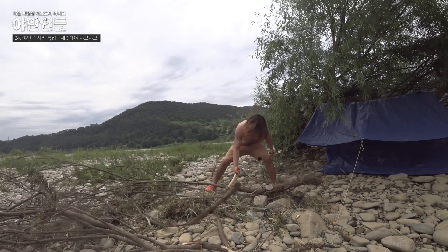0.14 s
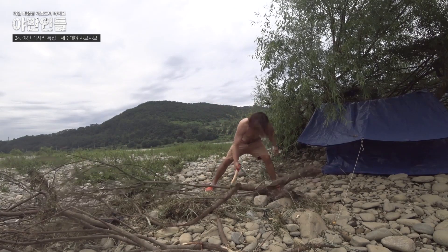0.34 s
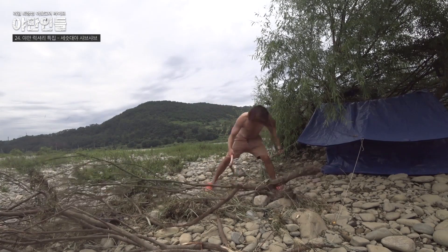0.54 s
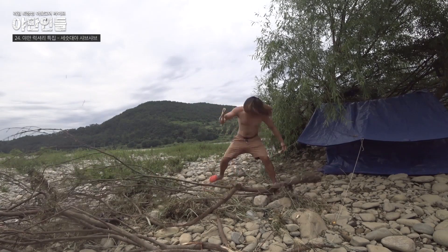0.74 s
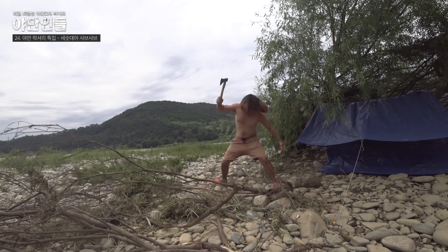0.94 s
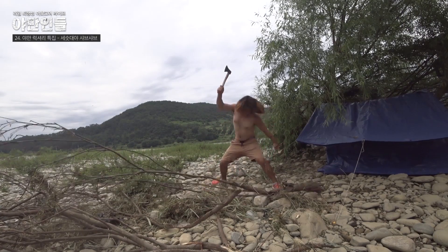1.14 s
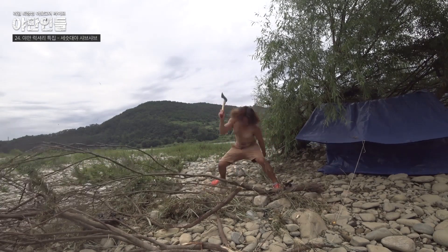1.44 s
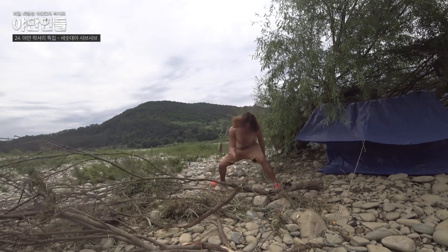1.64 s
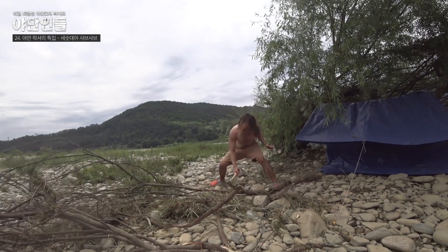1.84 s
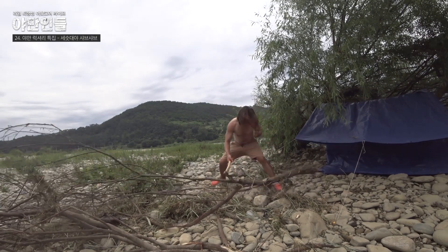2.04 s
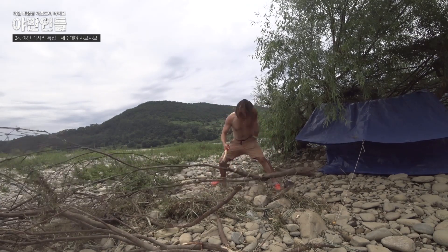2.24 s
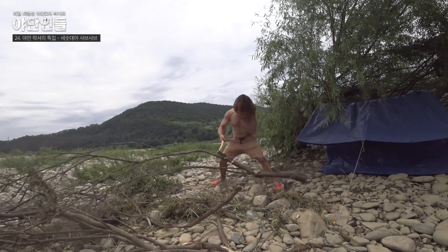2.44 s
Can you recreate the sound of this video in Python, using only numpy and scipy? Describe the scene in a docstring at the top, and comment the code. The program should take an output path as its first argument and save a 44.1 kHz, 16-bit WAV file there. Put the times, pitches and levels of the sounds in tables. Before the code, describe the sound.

A hatchet chops into a dead log at about 0.25 seconds, a sharp crack with a woody thud, and dry twigs rattle until 0.6. From 0.9 to 1.7, loose stones clack and grind softly underfoot and a twig snaps. A second chop lands at 1.8 with another rattle, followed by light stone scuffs until 2.5. Everything is a few metres away, over a faint, low outdoor rush.

```python
"""Two hatchet chops crack into a dead, branching log on a stony riverbank, a few metres away.
Each bite of the blade knocks the log against the cobbles: the trunk thuds and rings, and its dry
twigs rattle and settle. Between and after the blows, feet clack and grind on loose stones and the
odd twig snaps. A short scatter off the bank and a low outdoor rush sit behind it all."""
import sys
import numpy as np
from scipy import signal
from scipy.fft import rfft, irfft, next_fast_len
from scipy.io import wavfile

SR = 44100
rng = np.random.default_rng(int(sys.argv[2]) if len(sys.argv) > 2 else 0)


def master_out(mix):
    """Clip the mix to full scale and print it as 16-bit PCM to the path in sys.argv[1]."""
    frames = np.transpose(np.atleast_2d(mix))
    ceiling = np.clip(frames, -1, 1)
    pcm = np.round(ceiling * 32767).astype(np.int16)
    wavfile.write(sys.argv[1], SR, pcm)


N = 114660

# the blade biting and the wood splitting: start_s, level_db, decay_s, pitch_hz, width_ratio
BITES = [(.2474, -18, .0003, 3250, .12), (.2545, -21.5, .003, 3300, .17), (.2818, -23.5, .003, 2300, .35),
         (1.7870, -32, .004, 3100, .25), (1.7922, -18.5, .0018, 2500, .36), (1.8005, -26, .003, 1400, .35),
         (1.8148, -19.5, .006, 2100, .33), (1.8410, -24, .005, 1500, .35)]
# EQ of the crunch under each bite: freq_hz, gain_db
CRUNCH_EQ = [(60, -40), (300, -10), (1000, -1), (3700, 0), (4500, -9), (5800, -9), (7000, -20),
             (11000, -28), (12000, -50)]

# the log knocked by the blow and landing on the stones: start_s, level_db, decay_s, ring_pitch_ratio
THUDS = [(.2485, -23.5, .006, 1), (.2545, -23, .012, 1), (.2825, -19.5, .005, 1), (.2890, -21.5, .017, 1),
         (1.8000, -23.5, .018, 1.245), (1.8160, -23, .024, 1.245), (1.8380, -24.5, .02, 1.245)]
# EQ of the dull thud: freq_hz, gain_db
THUD_EQ = [(30, -67), (70, -16.5), (290, -5), (1200, -1), (2200, -7), (4000, -16.5), (10000, -28),
           (12000, -66)]
# the trunk's ringing modes at a pitch ratio of 1: pitch_hz, level_db, t60_s
LOG_MODES = [(276, 8, .15), (330, 6, .13), (410, 13, .1), (650, 5, .12), (852, 4, .12), (951, 8, .09),
             (1255, 10, .07), (1470, 9, .1), (2072, 5, .1)]

# the crown shaken by each blow: start_s, level_db, rise_s, hold_s, decay_s
SHAKES = [(0.24, -25, 0.066, 0.21, 0.042), (1.782, -22.5, 0.088, 0.059, 0.13)]
# branches whipping against each other: peak_s, level_db, width_s
CLASHES = [(.349, -19.5, 0.011), (.369, -16.5, 0.0056), (.410, -16.5, 0.0033), (.423, -17.5, 0.013),
           (.466, -22, 0.0075), (.58, -30, 0.013), (.732, -35, 0.008), (1.09, -31.5, 0.0055),
           (1.906, -21.5, 0.0088), (1.975, -25.5, 0.0057), (2.008, -20, 0.0025), (2.242, -30, 0.0075)]
# level curve of the twigs that keep swaying: time_s, level_db
SWAY = [(0, -43.5), (.12, -42.5), (.23, -53), (.6, -42), (1.0, -37.5), (1.2, -37), (1.4, -41),
        (1.65, -38.5), (1.77, -44), (2.25, -36.5), (2.4, -39), (2.6, -36)]
# EQ of the rattling twigs: freq_hz, gain_db
TWIG_EQ = [(100, -29.5), (250, -22), (600, -5), (1200, -2.5), (1900, -2.5), (3300, 0.5), (4000, -1),
           (4600, -7), (5900, -6.5), (7000, -15), (8300, -15.5), (11200, -23)]
# single sticks clacking together: start_s, level_db, pitch_hz
STICKS = [(.463, -26, 3500), (.4985, -20.5, 2560), (.849, -35, 2950), (1.540, -33.5, 2390),
          (1.556, -34, 3020), (2.094, -31, 3200), (2.522, -34.5, 2780)]
# dry twigs snapping: start_s, level_db, decay_s
SNAPS = [(.4175, -27, .00089), (1.1272, -25, .0014), (1.7005, -35.5, .0012), (1.7935, -27.5, .002)]
# EQ of a snap: freq_hz, gain_db
SNAP_EQ = [(50, -25), (800, -5), (1200, 2), (2800, 3.5), (4200, 1), (5400, 0), (11500, -14)]
# a fibre tearing with a fine tick: start_s, level_db, pitch_hz
FIBRES = [(.2889, -32, 10800)]

# cobbles knocking underfoot: start_s, level_db, pitch_hz
STONES = [(.908, -28, 540), (0.932, -34.5, 1150), (1.032, -35, 1250), (1.142, -37.5, 940),
          (1.199, -34.5, 1080), (1.311, -36.5, 520), (1.418, -37, 950), (1.422, -38, 460),
          (2.320, -36, 880), (2.456, -38.5, 430)]
# soles grinding the stones together: peak_s, level_db, width_s
SCUFFS = [(.95, -35.5, 0.11), (1.085, -33.5, 0.01), (1.315, -34.5, 0.035), (1.40, -33.5, 0.014),
          (1.475, -33.5, 0.034), (1.71, -38, 0.067), (2.225, -35.5, 0.13), (2.32, -37.5, 0.088)]
# EQ of the grinding: freq_hz, gain_db
SCUFF_EQ = [(120, -69), (300, -15), (480, 5), (900, 3.5), (1300, 2), (1700, -3), (3000, 0.5), (8000, -67)]
# one cobble ringing as it slides over another: peak_s, level_db, width_s
SLIDES = [(2.243, -37, .022), (2.276, -37, .028)]

# EQ of the outdoor rush: freq_hz, gain_db
AIR_EQ = [(30, -60), (55, -22.5), (100, -7), (170, 2), (260, 3.5), (400, -3), (700, -10), (1500, -13),
          (4000, -21), (11000, -76), (12000, -90)]
# level difference across the microphone pair: freq_hz, left_minus_right_db
MIC_BALANCE = [(60, 10), (110, -0.5), (200, -2.5), (350, -7), (630, -3), (1120, -4.5), (2000, -0.5),
               (3600, 2), (6500, 4), (11500, -1.5)]
# phase difference across the microphone pair: freq_hz, left_lead_rad
MIC_LEAD = [(60, .1), (300, .6), (700, .9), (2000, .8), (4000, .8), (6300, -.3)]

GRIT_RATE_HZ, GRIT_SPREAD_DB = 5110, 4  # the tiny fractures in every hit and slide
WIDE_ABOVE_HZ = 3200  # crackles spread in stereo above this


def hatchet():
    """The blade enters dry wood: a pitched crack over a broad crunch 10 dB down."""
    crack, crunch = np.zeros((2, N))
    for start_s, db, decay_s, hz, width in BITES:
        place(crack, start_s, db, resonate(contact(decay_s), hz, width))
        place(crunch, start_s, db - 10, contact(decay_s))
    soft_wood = signal.butter(6, 4800, fs=SR, output="sos")  # blunts the top of the crack
    return signal.sosfilt(soft_wood, crack) + eq(crunch, CRUNCH_EQ)


def log(ring_db=-5.5):
    """Dull knocks set the trunk ringing, pitched higher on the second chop."""
    t = clock()[:SR // 2]
    knocks, rings = 0, 0
    for start_s, level_db, decay_s, pitch_ratio in THUDS:
        knock = hits([(start_s, level_db, decay_s)])
        ring = sum(amp(db) * np.cos(2 * np.pi * pitch_ratio * hz * t) * amp(-60 * t / t60_s)
                   for hz, db, t60_s in LOG_MODES)
        knocks += knock
        rings += through(knock, ring / np.linalg.norm(ring))
    return eq(knocks, THUD_EQ) + amp(ring_db) * rings


def twigs():
    """The dry crown rattles at each blow, clashes as it swings and ticks on; sticks clack, twigs snap."""
    t = clock()
    rattle_power = swells(CLASHES)
    for start_s, db, rise_s, hold_s, decay_s in SHAKES:
        attack = np.clip((t - start_s) / rise_s, 0, 1)
        release = np.exp(-np.maximum(t - start_s - rise_s - hold_s, 0) / decay_s)
        rattle_power += (amp(db) * attack * release) ** 2
    sway_db = np.interp(t, *np.array(SWAY).T)
    dry_twigs = dict(spread_db=3.3, ring_s=.0014, stereo_width=.7, bodies=20)
    rattle = crackle(rate_hz=190, **dry_twigs) * np.sqrt(rattle_power)
    rustle = crackle(rate_hz=120, **dry_twigs) * amp(sway_db)
    snaps = eq(hits(SNAPS), SNAP_EQ)
    fibres = clacks(FIBRES, width=.35, decay_s=.0003)
    sticks = clacks(STICKS, width=.25, decay_s=.004)
    return eq(rattle + rustle, TWIG_EQ) + sticks + snaps + fibres


def feet():
    """Cobbles clack, grind and slide under shifting feet, panned a little right."""
    gravel = crackle(rate_hz=64, spread_db=6, ring_s=.0086, stereo_width=.81, bodies=8)
    grind = eq(gravel * np.sqrt(swells(SCUFFS)), SCUFF_EQ)
    friction = clicks(GRIT_RATE_HZ, GRIT_SPREAD_DB, N)
    slide = unit(resonate(friction, hz=1290, width=.024)) * np.sqrt(swells(SLIDES))
    knocks = clacks(STONES, width=.3, decay_s=.006)
    return pan(knocks + grind + slide, right_db=5)


def bank_scatter(direct, level_db=-14.5, decay_s=.064, predelay_s=.0029):
    """Stones and trees throw back a short, diffuse tail."""
    t = clock()[:SR // 2]
    mid, side = rng.standard_normal((2, len(t))) * np.exp(-t / decay_s) * (t > predelay_s)
    tail = stereo(mid, .3 * side) / np.linalg.norm(mid)
    return amp(level_db) * through(direct, tail)


def air(level_db=-42.5):
    """The bed: the steady low rush of the open valley."""
    mid, side = rng.standard_normal((2, N))
    rush = eq(stereo(mid, .025 * side), AIR_EQ)
    return pan(rush, right_db=3) * amp(level_db)


def contact(decay_s, rise_s=.0005, grit_db=4.5, size=4096):
    """One impact: a sharp spike, then a burst of tiny fractures dying away."""
    t = np.arange(size) / SR
    envelope = np.minimum(t / rise_s, 1) * np.exp(-t / decay_s)
    burst = clicks(GRIT_RATE_HZ, GRIT_SPREAD_DB, size) * envelope * amp(grit_db)
    burst[0] += 2
    return burst


def hits(table):
    """A track of unpitched impacts from rows of start_s, level_db, decay_s."""
    track = np.zeros(N)
    for start_s, db, decay_s in table:
        place(track, start_s, db, contact(decay_s))
    return track


def clacks(table, width, decay_s):
    """A track of short pitched knocks from rows of start_s, level_db, pitch_hz."""
    track = np.zeros(N)
    for start_s, db, hz in table:
        place(track, start_s, db, resonate(contact(decay_s), hz, width))
    return track


def crackle(rate_hz, spread_db, ring_s, stereo_width, bodies, size=512):
    """Many small bodies, each clicking at random around rate_hz with its own brief ring and position."""
    fade = np.exp(-np.arange(size) / SR / ring_s)
    treble = signal.butter(2, WIDE_ABOVE_HZ, "high", fs=SR, output="sos")
    texture = 0
    for _ in range(bodies):
        mid, side = rng.standard_normal((2, size)) * fade
        ring = stereo(mid, stereo_width * signal.sosfilt(treble, side))
        texture += through(clicks(rate_hz, spread_db, N), ring)
    return unit(texture)


def clicks(rate_hz, spread_db, size):
    """Random clicks of uneven strength."""
    fires = rng.random(size) < rate_hz / SR
    level_db = spread_db * np.clip(rng.standard_normal(size), -2, 2)
    return fires * amp(level_db) * rng.choice([-1, 1], size)


def swells(table):
    """Power envelope of bell-shaped swells from rows of peak_s, level_db, width_s."""
    t = clock()
    return sum(amp(db) ** 2 / (1 + ((t - peak_s) / width_s) ** 2 / 2) ** 3
               for peak_s, db, width_s in table)


def place(track, start_s, db, sound):
    """Drop in a one-shot with the energy of 10 ms at the given level."""
    start = int(start_s * SR)
    gain = amp(db) * np.sqrt(SR / 100) / np.linalg.norm(sound)
    track[start:start + len(sound)] += gain * sound[:N - start]


def resonate(x, hz, width):
    """One resonance, its width relative to its pitch, run twice for steep skirts."""
    b, a = signal.iirpeak(hz, .5 / width, fs=SR)
    return signal.lfilter(b, a, signal.lfilter(b, a, x))


def eq(x, points, size=4096):
    """Minimum-phase EQ of unit energy, shaped by points of freq_hz, gain_db."""
    cepstrum = irfft(np.log(amp(over_bins(points, size))))
    cepstrum[1:size // 2] *= 2
    cepstrum[size // 2 + 1:] = 0
    response = irfft(np.exp(rfft(cepstrum)))
    return through(x, response / np.linalg.norm(response))


def over_bins(points, size):
    """Draw a curve across the FFT bins, joining its points on a log frequency axis."""
    hz, value = np.array(points, float).T
    return np.interp(np.log(np.fft.rfftfreq(size, 1 / SR) + 1), np.log(hz), value)


def through(x, response):
    """Convolve with a response and keep the scene's length."""
    return signal.fftconvolve(np.atleast_2d(x), np.atleast_2d(response), axes=-1)[:, :N]


def pan(x, right_db):
    """Lean a sound to the right."""
    return x * amp(np.array([[-right_db], [right_db]]) / 2)


def stereo(mid, side):
    """Left and right from mid and side."""
    return np.array([mid + side, mid - side])


def amp(db):
    """Decibels to gain."""
    return 10 ** (np.asarray(db) / 20)


def unit(x):
    """Scale to rms 1."""
    return x / np.sqrt(np.mean(x ** 2) + 1e-18)


def clock():
    """Time of every sample in seconds."""
    return np.arange(N) / SR


def scene():
    """The mix: chops, twigs and feet up front, their scatter off the bank and the air bed behind."""
    direct = hatchet() + log() + twigs() + feet()
    return direct + bank_scatter(direct) + air()


def record(dry):
    """The microphone pair colours left and right differently; deep bass and extreme top are cut."""
    size = next_fast_len(N + SR // 10) // 2 * 2
    left = amp(over_bins(MIC_BALANCE, size) / 2) * np.exp(1j * over_bins(MIC_LEAD, size) / 2)
    heard = irfft(rfft(dry, size) * np.array([left, 1 / left]), size)[:, :N]
    low_cut = signal.butter(2, 35, "high", fs=SR, output="sos")
    high_cut = signal.ellip(10, .2, 80, 11300, fs=SR, output="sos")
    for stage in (low_cut, low_cut, high_cut):
        heard = signal.sosfilt(stage, heard)
    return heard


dry = scene()
out = record(dry)
master_out(out)
```